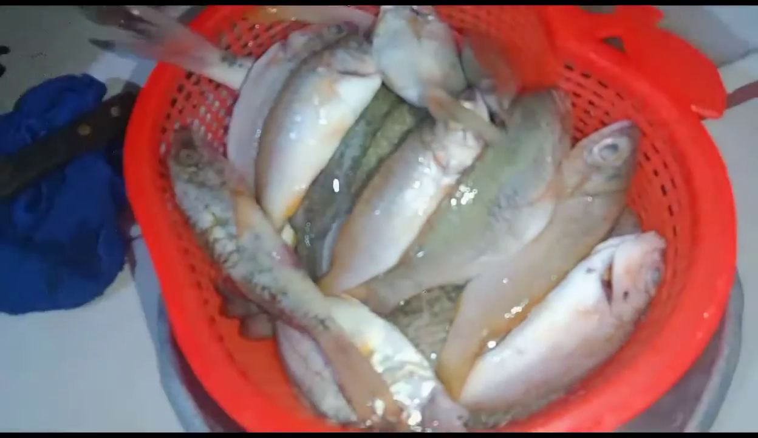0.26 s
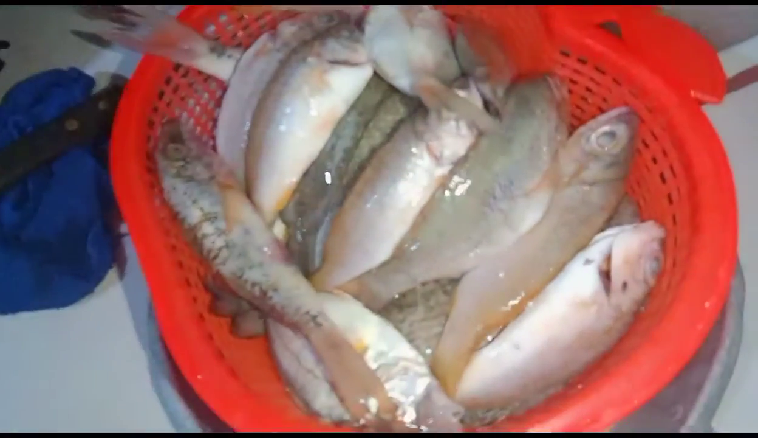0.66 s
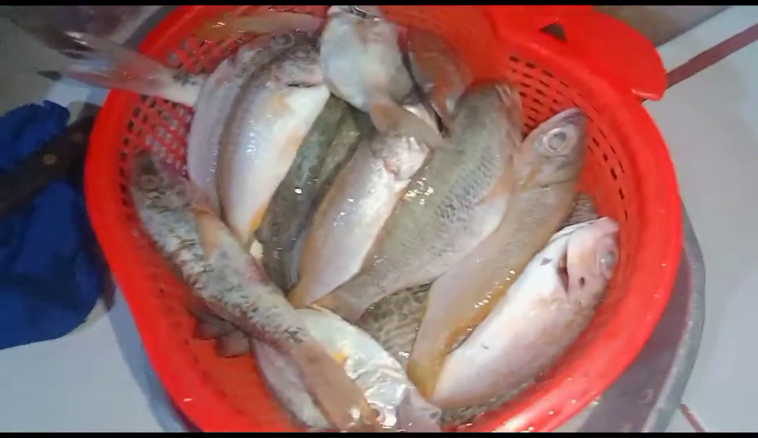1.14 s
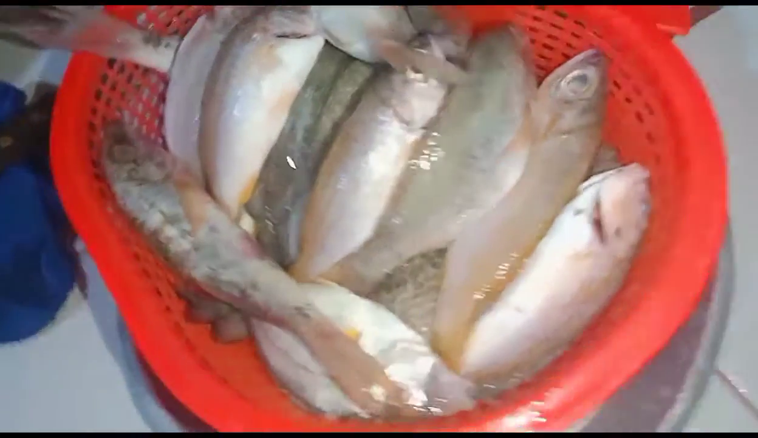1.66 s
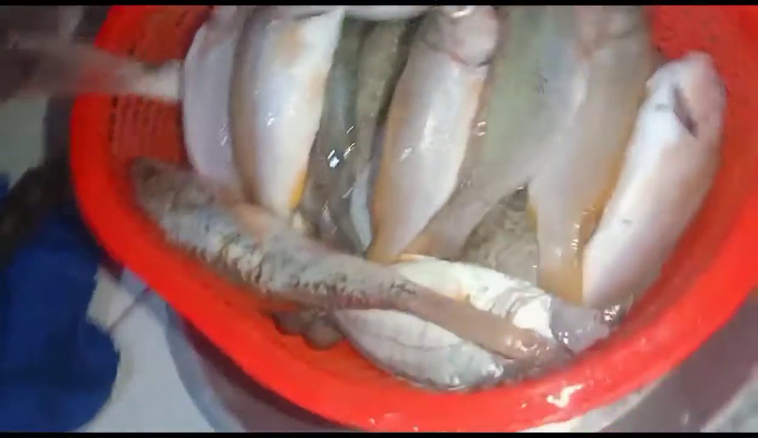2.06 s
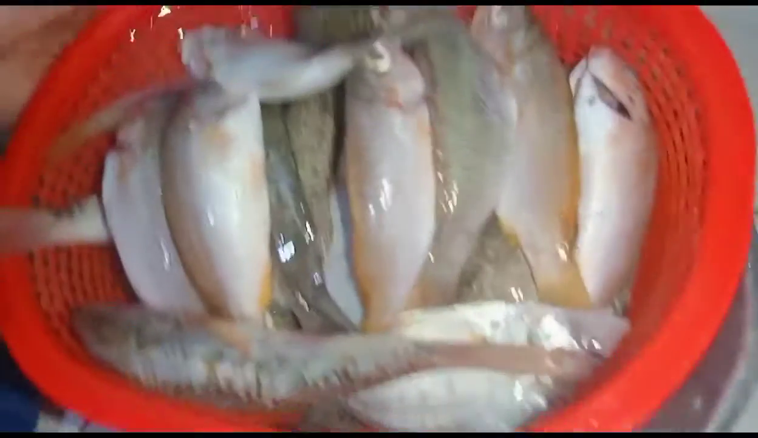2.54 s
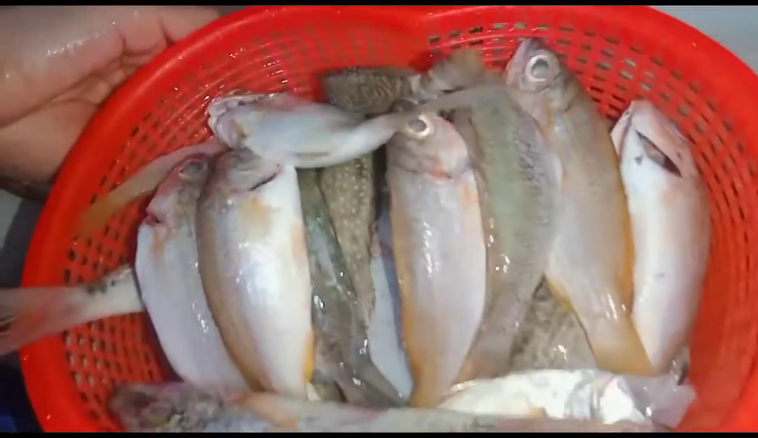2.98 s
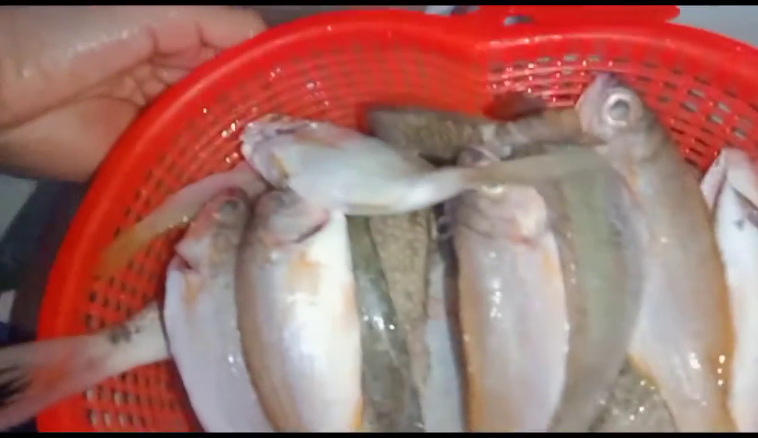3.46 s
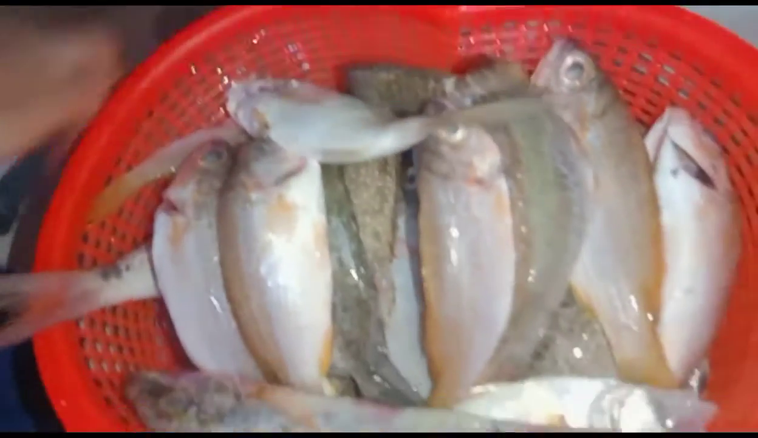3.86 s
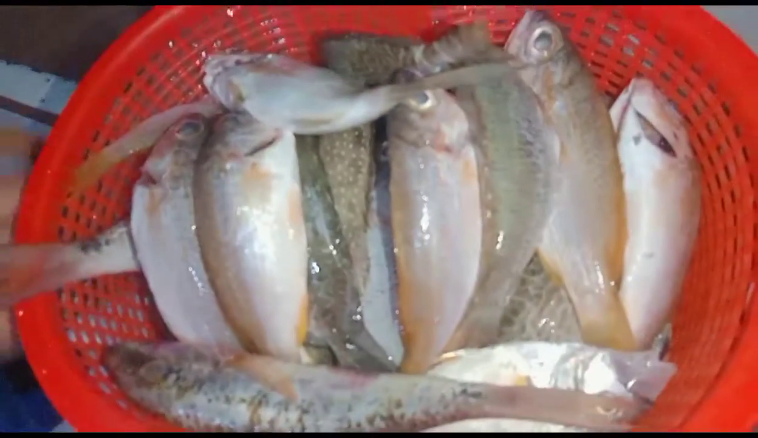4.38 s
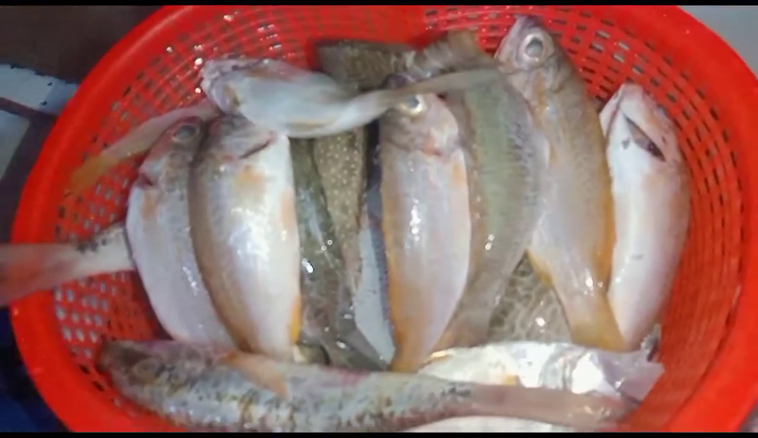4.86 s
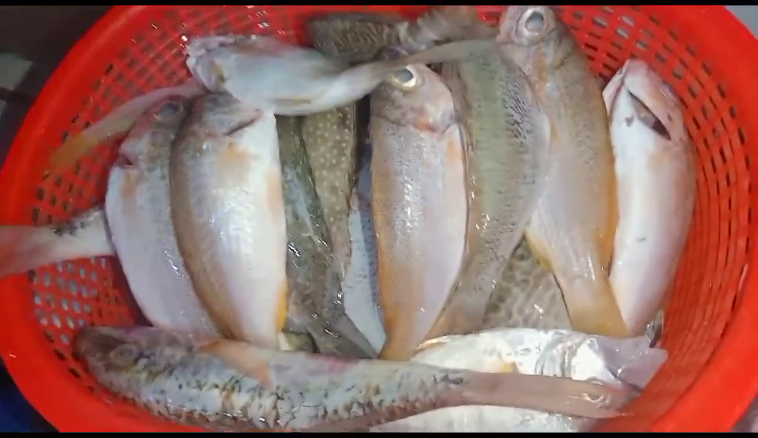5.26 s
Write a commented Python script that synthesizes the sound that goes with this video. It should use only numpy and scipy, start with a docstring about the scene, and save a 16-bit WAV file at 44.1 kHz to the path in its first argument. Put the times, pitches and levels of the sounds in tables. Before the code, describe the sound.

Close, slightly rough pickup of fish being rinsed over a basin indoors. Irregular sticky smacks and tiny bubbles come first, with round gulps and gurgles beneath. A brief lull leads to two clusters of strong ringing water slaps on plastic, then a bright wet chirp and spray. Afterwards only a dry tick, dull handling bumps, a swish of cloth and the low steady room hum remain.

```python
"""A kitchen with a low mains hum: small wet fish lie in a plastic colander over a basin of water. Water seeps,
squeaks and gulps through the mesh as the colander is turned: ringing air pockets and tiny bubbles. Then it is
shaken and slaps the water: the hollow under it and the basin wall ring under noisy bursts of drops. Spray falls
back as filtered grains, something bumps softly and a sleeve brushes past as swelling noise."""
import sys
import numpy as np
from scipy import signal
from scipy.fft import rfft, irfft, next_fast_len
from scipy.io import wavfile
from scipy.ndimage import uniform_filter1d, minimum_filter1d

SR = 44100
rng = np.random.default_rng(int(sys.argv[2]) if len(sys.argv) > 2 else 0)


def materialize(psi):
    """Save the field psi as 16-bit PCM at rate SR to the path in sys.argv[1].

    A 1-D psi becomes a single channel; in a 2-D psi each row is a channel.
    """
    bounded = np.clip(np.atleast_2d(psi).T, -1, 1)
    quanta = np.round(bounded * 32767).astype(np.int16)
    wavfile.write(sys.argv[1], SR, quanta)


N = 243541
TIME = np.arange(N) / SR

# seepage while the colander is turned, before level trims: time_s, crackle_db, fizz_db
SEEPAGE = [(0.0, -59.5, -68), (0.12, -58, -66.5), (0.26, -55, -59.5), (0.38, -59, -65.5),
           (0.53, -60.5, -65), (0.71, -54.5, -60.5), (1.16, -52, -57.5), (1.47, -63.5, -67),
           (1.7, -51.5, -67), (2.0, -60.5, -65.5), (2.13, -52, -61.5), (2.39, -40, -61.5),
           (2.46, -42.5, -54.5), (2.58, -47.5, -51.5), (2.82, -55, -62.5), (2.9, -46.5, -63),
           (3.02, -66.5, -75.5), (3.2, -67.5, -82.5)]
# the last trickle, same columns: time_s, crackle_db, fizz_db
LAST_TRICKLE = [(3.9, -61.5, -79.5), (4.199, -69.5, -87), (5.52, -68, -94.5)]


def from_db(db):
    """Decibels to gain."""
    return 10 ** (np.asarray(db) / 20)


def rms_one(x):
    """Scale to unit power."""
    return x / np.sqrt(np.mean(x ** 2) + 1e-20)


def in_time(rows):
    """The columns of a curve at every sample."""
    time_s, *columns = np.transpose(rows)
    return [np.interp(TIME, time_s, column) for column in columns]


def add(out, start_s, sound):
    """Mix a sound in at start_s."""
    i = max(round(start_s * SR), 0)
    out[i:i + len(sound)] += sound[:N - i]


def colour(x, spectrum):
    """Causal minimum-phase filter of unit-power gain, falling 18 dB per octave past the spectrum's ends."""
    size = next_fast_len(N + 8192, real=True) // 2 * 2
    hz, level_db = np.transpose(spectrum)
    f = np.maximum(np.arange(size // 2 + 1) * SR / size, 1)
    octaves_outside = np.maximum(np.log2(hz[0] / f), 0) + np.maximum(np.log2(f / hz[-1]), 0)
    curve_db = np.interp(np.log(f), np.log(hz), level_db) - 18 * np.minimum(octaves_outside, 4)
    gain = rms_one(from_db(curve_db))
    # the folded cepstrum gives the minimum phase
    cepstrum = irfft(np.log(gain))[:size // 2]
    cepstrum[1:] *= 2
    return irfft(rfft(x, size) * np.exp(rfft(cepstrum, size)))[:N]


def resonance(x, hz, width_hz):
    """Two-pole resonance with gain 1 on top."""
    r = np.exp(-np.pi * width_hz / SR)
    numerator = np.array([1, 0, -1]) * (1 - r * r) / 2
    denominator = [1, -2 * r * np.cos(2 * np.pi * hz / SR), r * r]
    return signal.lfilter(numerator, denominator, x + 1e-18)


def fade(t60_s, rise_s):
    """A quick swell and an exponential decay, peak 1."""
    t = TIME[:int((t60_s + rise_s) * SR * 1.5) + 2]
    shape = (1 - np.exp(-t / rise_s)) * from_db(-60 * t / t60_s)
    return shape / shape.max()


def swells(rows):
    """Gaussian rises and falls of level."""
    return sum(from_db(db) * np.exp(-.5 * ((TIME - s) / sigma_s) ** 2) for s, db, sigma_s in rows)


def grains(per_s, spread_db):
    """Random clicks of very unequal size, unit power."""
    sizes = from_db(spread_db * np.minimum(rng.exponential(1, N), 3.5))
    signs = rng.choice([-1, 1], N)
    return rms_one(sizes * signs * (rng.random(N) < per_s / SR))


def pocket(hz, t60_s, glide_oct_per_s, rise_s):
    """Trapped air rings; its pitch slides as the cavity changes shape."""
    shape = fade(t60_s, rise_s)
    slide_s = t60_s * (1 - np.exp(-TIME[:len(shape)] / t60_s))
    pitch_hz = hz * 2 ** (glide_oct_per_s * slide_s)
    return shape * np.sin(2 * np.pi * np.cumsum(pitch_hz) / SR)


def bubble(hz, t60_s, glide_oct_per_s, wobble):
    """A ringing air pocket whose wet film flutters every few cycles."""
    depth, cycles_per_knot = .4, 4
    tone = pocket(hz, t60_s, glide_oct_per_s, rise_s=0.0014)
    knots = TIME[:len(tone)] * hz / cycles_per_knot
    return tone * (1 + depth * np.interp(knots, np.arange(len(wobble)), wobble))


def tiny_bubbles(clicks, low_hz, high_hz, cycles):
    """Each click rings one of 32 small bubble sizes, which swells and dies; cycles is centre over width."""
    dealt = rng.integers(0, 32, N)
    out = np.zeros(N)
    for k, hz in enumerate(np.geomspace(low_hz, high_hz, 32)):
        once = resonance(clicks * (dealt == k), hz, hz / cycles)
        out += resonance(once, hz, hz / cycles)
    return rms_one(out)


def wet_noise(level_db, pops, spectrum, wash_db):
    """Separate bubbles over a smooth wash; as the flow dies away the bubbles recede first."""
    lively = np.clip((level_db + 73) / 20, .1, 1)
    mix = lively * pops + from_db(wash_db) * rng.standard_normal(N)
    return from_db(level_db) * rms_one(colour(mix, spectrum))


def background():
    """A slightly wavering hum over the low rush of the room."""
    # mains hum and motor lines: pitch_hz, mean_rms_db
    hum_lines = [(59.2, -58), (118.4, -65.5), (172.3, -62), (285.3, -59), (355.3, -93), (398.4, -60)]
    # low rush of the room: time_s, level_db
    rush_curve = [(0, -55.5), (2.5, -54.5), (5.52, -55.5)]
    # rush spectrum: freq_hz, density_db_per_hz (relative)
    air_spectrum = [(44, -16), (55, -9.5), (85, -6.5), (150, -3), (420, -4.5), (620, -20), (1000, -20.5),
                    (3300, -30.5), (6000, -38), (8000, -50), (16000, -58)]
    knots_s = np.arange(0, TIME[-1] + 1, 1 / 10)

    def waver():
        """Random curve with ten knots per second."""
        return np.interp(TIME, knots_s, rng.standard_normal(len(knots_s)))

    hum = np.zeros(N)
    for hz, db in hum_lines:
        amplitude = from_db(db + 0.58 * waver()) * np.sqrt(2)
        hum += amplitude * np.sin(2 * np.pi * hz * TIME + 0.47 * waver())
    return hum + from_db(in_time(rush_curve)[0]) * colour(rng.standard_normal(N), air_spectrum)


def seeping():
    """Films of water break in the mesh and between the fish, in tiny uneven spurts."""
    # spectra of the coarse and fine bubbles: freq_hz, density_db_per_hz (relative)
    crackle_spectrum = [(900, -18.5), (1500, -5), (2500, 0.5), (3400, 4.5), (4500, -11.5), (6000, -30)]
    fizz_spectrum = [(3500, -13), (5000, -9.5), (6500, -2.5), (8300, 2), (10500, -11.5), (13000, -4),
                     (15500, -8.5)]
    spurts_per_s, spurt_t60_s, spurt_share = 83, 0.027, 0.72
    crackle_trim_db, fizz_trim_db = 0.5, -2
    crackle_db, fizz_db = in_time(SEEPAGE + LAST_TRICKLE)
    onsets = np.abs(grains(spurts_per_s, spread_db=0.5))
    spurts = signal.fftconvolve(onsets, fade(spurt_t60_s, rise_s=.0005))[:N]
    flow = rms_one(1 + spurt_share * rms_one(spurts))
    crackle = tiny_bubbles(grains(1300, spread_db=6.0), 1200, 5020, cycles=29)
    fizz = tiny_bubbles(grains(2000, spread_db=9.0), 4900, 13000, cycles=14)
    fizz += 0.55 * grains(900, spread_db=1.5)
    coarse = wet_noise(crackle_db + crackle_trim_db, crackle, crackle_spectrum, wash_db=-2)
    fine = wet_noise(fizz_db + fizz_trim_db, fizz, fizz_spectrum, wash_db=-3)
    return flow * (coarse + fine)


def smacks():
    """A wet film tears: a crackling burst in a small cavity, a dull plastic knock and a spray of tiny bubbles."""
    # smacks of fish and falling spray, levels relative: start_s, burst_db, pitch_hz, spray_db, mist_db, t60_s
    smack_rows = [(0.0318, -58, 2730, -77, -45, 0.042), (.1, -34.5, 2960, -50, -44, 0.044),
                  (0.131, -34, 3240, -60, -59, 0.027), (.222, -39, 2750, -51, -58, 0.097),
                  (.293, -43, 3400, -58, -46.5, 0.37), (0.3334, -25.5, 3260, -63, -47, 0.065),
                  (0.356, -28, 2860, -66, -40, 0.11), (0.393, -23, 2770, -49, -40, 0.019),
                  (0.422, -63, 1550, -36.5, -38, 0.056), (.5263, -33, 3660, -66, -41.5, 0.055),
                  (0.611, -27, 2610, -40, -42.5, 0.31), (0.6837, -35, 2840, -36.5, -42, 0.092),
                  (0.7377, -23, 2800, -44, -45, 0.072), (0.7562, -20, 3080, -52, -69, 0.036),
                  (0.9404, -24, 2650, -62, -46, 0.12), (0.954, -26.5, 3280, -60, -44, 0.27),
                  (0.9973, -31, 2340, -31.5, -40.5, 0.12), (1.0226, -26.5, 2100, -30.5, -35.5, 0.068),
                  (1.0465, -56, 2430, -27.5, -34, .05), (1.117, -22, 2150, -26, -27.5, 0.038),
                  (1.1538, -25.5, 2650, -61, -70, 0.079), (1.2188, -23.5, 3140, -44, -38.5, 0.052),
                  (1.268, -30.5, 1980, -43.5, -53, 0.076), (1.3156, -27.5, 3330, -38, -40, 0.012),
                  (1.3779, -26.5, 3140, -64, -46.5, 0.048), (1.6577, -27, 1570, -69, -56, 0.14),
                  (1.802, -31.5, 1630, -60, -61, 0.081), (2.22, -21.5, 2420, -59, -44, 0.13),
                  (2.346, -25.5, 3000, -58, -45, 0.23), (2.5317, -20, 3030, -29.5, -51, .03),
                  (2.555, -33, 3220, -32, -46, .02), (2.591, -25.5, 2960, -39.5, -41, .03),
                  (2.7074, -19.5, 1810, -40, -61, 0.027), (2.8458, -27, 3380, -56, -64, .07),
                  (2.8582, -24.5, 2940, -33, -67, 0.076), (3.0373, -37, 2980, -55, -47.5, 0.075),
                  (3.2512, -25, 2970, -28, -52, .08), (3.9538, -25.5, 3390, -25, -32.5, .13),
                  (3.981, -12.5, 2530, -34, -59.5, 0.046), (4.0061, -25, 2830, -18, -55, 0.08),
                  (4.056, -40, 3050, -29, -46, 0.13), (4.0758, -27, 2920, -33.5, -47, 0.058)]
    # spectra of knock, spray and finest mist: freq_hz, density_db_per_hz (relative)
    knock_spectrum = [(170, -1.5), (400, -3.5), (650, -12.5), (1000, -0.5), (1700, -5.5)]
    spray_spectrum = [(250, -3.5), (700, -0.5), (2500, 10), (4500, 0), (7200, 6), (8300, -26), (10000, -13)]
    mist_spectrum = [(7000, -3.5), (8500, 3), (10000, -10.5), (12000, -10), (15500, -9.5)]
    rise_share = .009  # of t60: a film that tears for longer also starts more softly
    out, knock, spray, mist = np.zeros((4, N))
    tearing = grains(6400, spread_db=5.0)
    for s, db, hz, spray_db, mist_db, t60_s in smack_rows:
        shape = fade(t60_s, rise_s=rise_share * t60_s)
        tear = tearing[int(s * SR):][:len(shape)]
        cavity = resonance(resonance(tear, hz, hz * 0.4), hz, hz * 0.36)
        add(out, s, from_db(db - 6.0) * shape * rms_one(cavity))
        add(knock, s, from_db(db - 21.5) * shape)
        add(spray, s, from_db(spray_db) * shape)
        add(mist, s, from_db(mist_db) * shape)
    drops = tiny_bubbles(grains(4000, spread_db=4.5), 4000, 15500, cycles=19) + 1.5 * tearing
    out += colour(knock * tearing, knock_spectrum)
    out += spray * rms_one(colour(drops, spray_spectrum))
    return out + mist * rms_one(colour(drops, mist_spectrum))


def bubbles():
    """Clear squeaks of air between the fish: gliding, fluttering air pockets."""
    # squeaks, levels relative: start_s, pitch_hz, level_db, t60_s, glide_oct_per_s
    squeak_rows = [(.042, 2706, -35, 0.038, 1), (.101, 2700, -24.5, 0.014, -10),
                   (.194, 2610, -31.5, 0.05, 10.5), (.233, 2890, -29.5, 0.02, 16),
                   (.3925, 3040, -21.5, 0.027, 49.5), (.634, 2377, -20, 0.09, 6),
                   (.7565, 3570, -15.5, 0.007, -19), (.97, 2410, -22.5, 0.12, -28.5),
                   (1.466, 3720, -33.5, 0.15, -18.5), (1.474, 6160, -40, .049, -9),
                   (1.483, 2730, -25.5, 0.011, -9), (1.659, 1570, -29, 0.15, 0.5),
                   (2.287, 1870, -22, 0.07, 21), (2.343, 3480, -17, 0.039, 5), (2.49, 7220, -38, .025, 1.5),
                   (2.574, 2675, -31.5, 0.24, 4.5), (2.575, 6950, -25.5, 0.026, 9),
                   (2.703, 1966, -27.5, 0.1, -0.5), (2.764, 6670, -33.5, 0.035, 2.5),
                   (2.861, 6200, -27, 0.028, 0), (2.935, 2040, -38.5, 0.11, 11.5),
                   (4.009, 3025, -10.5, 0.044, 2), (4.010, 3570, -15.5, 0.071, 1.5),
                   (4.009, 1653, -25.5, 0.21, 0.5), (4.008, 1021, -17, 0.023, -2)]
    out = np.zeros(N)
    wobbles = rng.standard_normal((len(squeak_rows), 400))
    for (s, hz, db, t60_s, glide), wobble in zip(squeak_rows, wobbles):
        add(out, s, from_db(db - 1.5) * bubble(hz, t60_s, glide, wobble))
    return out


def plastic():
    """Dry ticks, a light slide that makes the basin sing, and a short scrape that leaves its rim ringing."""
    # dry ticks: start_s, level_db (relative)
    tick_rows = [(4.426, -54.5), (4.505, -27.5), (5.079, -47)]
    # colander touching the basin rim: start_s, level_db (relative)
    touch_rows = [(4.574, -41)]
    # colander sliding on the basin: middle_s, level_db, sigma_s
    slide_rows = [(.35, -47.5, 0.08), (3.575, -38.5, 0.017)]
    # resonances of rim and basin wall: pitch_hz, width_hz, level_db (relative)
    rim_modes = [(458, 320, 2.5), (1240, 500, -2.5), (2370, 160, 7), (3060, 58, 5.5), (4260, 240, 4),
                 (5470, 97, -8), (5550, 120, 2), (5800, 100, -4)]
    wall_modes = [(880, 24, 10), (1496, 49, 1.5)]
    out, scrape = np.zeros((2, N))
    for s, db in tick_rows:
        snap = fade(0.0044, rise_s=0.00058)
        noise = resonance(rng.standard_normal(len(snap)), 3860, 2400)
        add(out, s, from_db(db) * pocket(2670, t60_s=0.0061, glide_oct_per_s=0, rise_s=0.00037))
        add(out, s, from_db(db - 8) * pocket(1120, t60_s=0.008, glide_oct_per_s=0, rise_s=0.00079))
        add(out, s, from_db(db - 13.5) * snap * rms_one(noise))
    for s, db in touch_rows:
        add(scrape, s, from_db(db) * fade(0.11, rise_s=0.0067))
        add(scrape, s, from_db(db - 17) * fade(0.99, rise_s=0.013))
    friction = rng.standard_normal(N)
    rim, wall = np.zeros((2, N))
    for hz, width_hz, db in rim_modes:
        rim += from_db(db) * resonance(resonance(friction, hz, width_hz), hz, hz / 2)
    for hz, width_hz, db in wall_modes:
        wall += from_db(db) * resonance(resonance(friction, hz, width_hz), hz, width_hz * 4)
    return out + scrape * rms_one(rim) + swells(slide_rows) * rms_one(wall)


def laps():
    """Each lap gurgles away in the basin and traps a pocket of air that gulps under the colander."""
    # laps, levels relative: start_s, slosh_db, gulp_db, gulp_pitch_hz
    lap_rows = [(.622, -35, -28.5, 772), (.903, -36, -27, 788), (1.003, -41, -28, 788),
                (1.070, -36, -30.5, 744), (1.268, -41, -35.5, 779), (1.379, -34, -18.5, 851.5),
                (1.402, -49.5, -27.5, 880), (1.659, -38.5, -67, 756), (1.803, -42.5, -48, 830),
                (2.220, -31.5, -25.5, 547), (2.382, -31.5, -15, 780.4), (2.455, -42, -28, 754),
                (2.495, -33.5, -24.5, 752), (2.705, -32, -32.5, 918), (2.85, -43.5, -38.5, 1020)]
    # slosh spectrum: freq_hz, density_db_per_hz (relative)
    water_spectrum = [(400, -4), (600, -2), (810, 4), (920, -1.5), (1150, -4.5), (1350, -6.5), (1560, -17),
                      (1800, -7.5), (2200, -25)]
    slosh_rise_s, slosh_t60_s = 0.0045, 0.42
    gulp_t60_s, gulp_oct_per_s = 0.23, 0.35
    gulps, stir = np.zeros((2, N))
    wobbles = rng.standard_normal((len(lap_rows), 400))
    for (s, slosh_db, gulp_db, hz), wobble in zip(lap_rows, wobbles):
        add(stir, s, from_db(slosh_db) * fade(slosh_t60_s, slosh_rise_s))
        add(gulps, s, from_db(gulp_db) * bubble(hz, gulp_t60_s, gulp_oct_per_s, wobble))
    slosh = colour(tiny_bubbles(grains(700, spread_db=3.0), 437, 1805, cycles=9.3), water_spectrum)
    return from_db(-4.5) * (gulps + stir * rms_one(slosh))


def stray_bubbles():
    """Small bubbles of random size and glide, louder where the seepage is stronger."""
    draws_per_s, low_hz, high_hz, t60_cycles = 240, 1310, 4260, 37.6
    above_crackle_db, spread_db, glide_spread_oct_per_s = 1.5, 6, 6.5
    dry_db = -55  # at or below this crackle level no stray bubbles form
    out, (crackle_db, _) = np.zeros(N), in_time(SEEPAGE + LAST_TRICKLE)
    draws = rng.random((2000, 2))[:int(draws_per_s * TIME[-1])]
    scatter = rng.standard_normal((2000, 60))
    for (when, size), (strength, bend, *wobble) in zip(draws, scatter):
        flow_db = crackle_db[int(when * N)]
        hz = low_hz * (high_hz / low_hz) ** size
        if flow_db > dry_db:
            level_db = flow_db + above_crackle_db + spread_db * np.tanh(strength)
            tone = bubble(hz, t60_cycles / hz, glide_spread_oct_per_s * bend, wobble)
            add(out, when * TIME[-1], from_db(level_db) * tone)
    return out


def handling():
    """Dull handling bumps ring two partials over a short rumble; cloth and hand brush past as noise."""
    # soft handling bumps, levels relative: start_s, level_db, pitch_hz, t60_s
    bump_rows = [(0.901, -37, 181, 0.11), (1.109, -41.5, 178, 0.21), (1.801, -33.5, 166, 0.16),
                 (2.22, -37.5, 436.6, 0.59), (2.389, -40, 269, 0.12), (2.706, -27.5, 420, .017),
                 (4.578, -36.5, 184, 0.14), (4.802, -42.5, 161, .2), (4.903, -30, 440, 0.035),
                 (4.922, -30.5, 356.5, 0.1), (4.927, -22, 143.6, 0.12), (4.962, -27.5, 145, 0.074),
                 (4.999, -40, 139.5, 0.33)]
    # swishes of sleeve and sliding hand: middle_s, level_db, sigma_s
    brush_rows = [(3.355, -49, 0.011), (3.575, -42, 0.015), (4.925, -52, 0.02), (5.239, -39, .046)]
    # spectra of rumble and cloth: freq_hz, density_db_per_hz (relative)
    thud_spectrum = [(90, 10.5), (170, -6.5), (400, 1), (700, -11), (1500, -19), (3000, -26)]
    cloth_spectrum = [(400, 13), (800, -7), (1800, -3), (2600, 3.5), (5500, 4.5), (6800, -5.5), (8000, -23),
                      (15000, -19)]
    out, rumble = np.zeros((2, N))
    for s, db, hz, t60_s in bump_rows:
        low = pocket(hz, t60_s, glide_oct_per_s=0.31, rise_s=0.035 * t60_s)
        high = pocket(hz * 1.406, t60_s * 0.87, glide_oct_per_s=-.4, rise_s=0.00067)
        add(out, s, from_db(db) * low)
        add(out, s, from_db(db - 8) * high)
        add(rumble, s, from_db(db - 11) * fade(t60_s * 0.59, rise_s=0.0043))
    out += rumble * colour(rng.standard_normal(N), thud_spectrum)
    return out + swells(brush_rows) * colour(rng.standard_normal(N), cloth_spectrum)


def held(length_s, t60_s):
    """A push: quick attack, a hold that throbs as the water rebounds, then a release."""
    attack_s, rebound_hz, rebound_depth = 0.0014, 65, 0.26
    t = TIME[:int((length_s + t60_s * 2) * SR)]
    throb = 1 - rebound_depth * np.sin(np.pi * rebound_hz * np.minimum(t, length_s)) ** 2
    release = from_db(-60 * np.maximum(t - length_s, 0) / t60_s)
    return (1 - np.exp(-t / attack_s)) * throb * release


def slaps():
    """Each slap rings the hollow under the colander and the basin wall, and throws drops against the plastic."""
    # slaps, levels relative: start_s, push_s, air_db, air_pitch_hz, glide_oct_per_s, wall_db, splash_db
    slap_rows = [(3.252, 0.0054, -9, 827, -2.5, -29, -19), (3.259, 0.0077, 0, 917, 1.8, -30, -29),
                 (3.276, .006, -1, 915, 3.4, -33.5, -27.5), (3.414, 0.033, -4, 961, 0.3, -19.5, -19.5),
                 (3.458, 0.017, -4.5, 995, .3, -27, -29.5), (3.589, 0.015, -10.5, 1001, -1, -23, -28.5),
                 (3.641, 0.026, -7.5, 934, -.3, -13.5, -14.5), (3.677, 0.014, -9, 981, 0, -13, -10.5),
                 (3.705, 0.026, -9.5, 919, -2, -10.5, -17), (3.917, 0.025, -23, 967.5, -2.5, -27, -23.5)]
    # paired ring of the basin wall: pitch_hz (before detuning), level_db (relative), t60_s
    wall_ring = [(1565, -7, .06), (1745, -5, .055)]
    # colander and basin resonances: pitch_hz, width_hz, level_db (relative)
    body_modes = [(440, 80, 6.5), (988, 52, 17.5), (1570, 210, -6), (1650, 180, 8.5), (2130, 400, 2),
                  (2934, 53, 12.5), (3263, 310, 4), (4100, 250, -17.5), (4650, 740, -8.5),
                  (6340, 1800, -13.5)]
    # splash spectrum: freq_hz, density_db_per_hz (relative)
    splash_spectrum = [(150, -8), (350, 3.5), (1200, 9), (3300, 5.5), (5000, 1), (7200, -16.5), (9000, -35),
                       (12500, -34), (16000, -56)]
    hollow_t60_s, splash_t60_s = .05, 0.064
    churn_pitch_share, churn_level_share = .014, .12
    wall_detune_share = .015  # the water load detunes the wall from slap to slap
    overtone_db = -18.5  # the fluttering film adds the second and third partials
    air, force = np.zeros((2, N))
    # churning water makes the hollow flutter in pitch and level
    churn_spectrum = [(20, -7.0), (80, -1.0), (200, -11.5)]
    churn = colour(rng.standard_normal(N), churn_spectrum)
    flutter = colour(rng.standard_normal(N), churn_spectrum)

    def sing(s, push_s, hz, glide, t60_s):
        """One resonance, shaken most while the push lasts and then ringing out."""
        shape = held(push_s, t60_s)
        shake = churn_pitch_share * shape * churn[int(s * SR):][:len(shape)]
        pitch_hz = hz * 2 ** (glide * TIME[:len(shape)]) * (1 + shake)
        phase = 2 * np.pi * np.cumsum(pitch_hz) / SR
        partials = np.sin(2 * phase) + np.sin(3 * phase)
        return shape * (np.sin(phase) + from_db(overtone_db) * shape * partials)

    for s, push_s, db, hz, glide, wall_db, splash_db in slap_rows:
        low = pocket(hz * .46, t60_s=.04, glide_oct_per_s=.3, rise_s=.0012)
        add(air, s, from_db(db - 3) * sing(s, push_s, hz, glide, hollow_t60_s))
        add(air, s, from_db(db - 20.5) * low)
        for ring_hz, ring_db, t60_s in wall_ring:
            loaded_hz = ring_hz * (1 + wall_detune_share * rng.uniform(-1.1, 1))
            add(air, s, from_db(wall_db + ring_db) * sing(s, push_s, loaded_hz, 0, t60_s))
        add(force, s, (from_db(splash_db) * held(push_s, splash_t60_s)) ** 2)
    drops = np.sqrt(force) * grains(12000, spread_db=1.5)
    body = np.zeros(N)
    for k, (hz, width_hz, db) in enumerate(body_modes):
        body += (-1) ** k * from_db(db) * resonance(drops, hz, width_hz)
    splash = colour(drops, splash_spectrum)
    return air * (1 + churn_level_share * flutter) + from_db(4) * body + from_db(-5.5) * splash


def draining():
    """Water draining off the mesh: a soft hiss that takes on its thin ring."""
    # draining: middle_s, level_db, sigma_s
    drain_rows = [(3.32, -55.5, 0.0089), (3.58, -47, 0.0071), (3.87, -59.5, 0.033), (4.075, -38, .015),
                  (4.14, -52.5, 0.017)]
    # ring of the wet mesh: pitch_hz, width_hz, level_db (relative)
    mesh_modes = [(3570, 200, 3), (4550, 86, 2), (5500, 81, -1.5), (5700, 83, 4.5), (6760, 160, -2.5),
                  (11300, 550, -7.5)]
    hiss, mesh = rng.standard_normal(N), np.zeros(N)
    for hz, width_hz, db in mesh_modes:
        mesh += from_db(db) * resonance(resonance(hiss, hz, width_hz), hz, hz / 4)
    return swells(drain_rows) * rms_one(mesh)


def kitchen(x):
    """Echoes from basin and floor, and a short tail that is dull in the treble."""
    # nearby surfaces: delay_s, level_db
    echo_rows = [(.0031, -23), (.0074, -17), (0.0131, -18), (0.0229, -35)]
    room_t60_s, room_db = 0.18, -14
    shape = fade(room_t60_s, rise_s=0.0019)
    dull = signal.butter(1, 6000, fs=SR, output="sos")
    tail = signal.sosfilt(dull, rng.standard_normal(len(shape))) * shape
    response = from_db(room_db) * tail / np.sqrt(np.sum(tail ** 2))
    response[0] += 1  # direct sound
    for delay_s, db in echo_rows:
        add(response, delay_s, from_db(db) * np.array([1, 2, 1]) / 4)
    return signal.fftconvolve(x, response)[:N]


def scene():
    """All the water and handling sounds in the kitchen."""
    water = seeping() + smacks() + bubbles() + laps() + stray_bubbles() + slaps() + draining()
    return (kitchen(water + plastic() + handling()) + background())[None]


def record(dry):
    """A limiter looks a few milliseconds ahead and catches the peaks; a steep low-pass cuts the top."""
    ceiling, reach_samples, cutoff_hz = .85, 260, 15800
    gain = minimum_filter1d(ceiling / np.maximum(np.abs(dry), ceiling), size=reach_samples)
    limited = dry * uniform_filter1d(gain, size=reach_samples)
    low_pass = signal.ellip(10, .2, 80, cutoff_hz, fs=SR, output="sos")
    return signal.sosfilt(low_pass, limited)


dry = scene()
out = record(dry)
materialize(out)
```